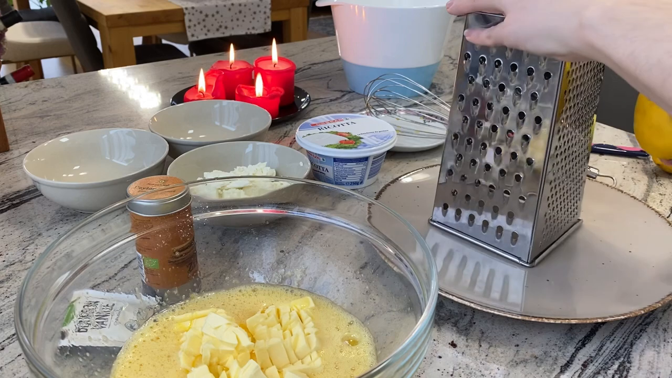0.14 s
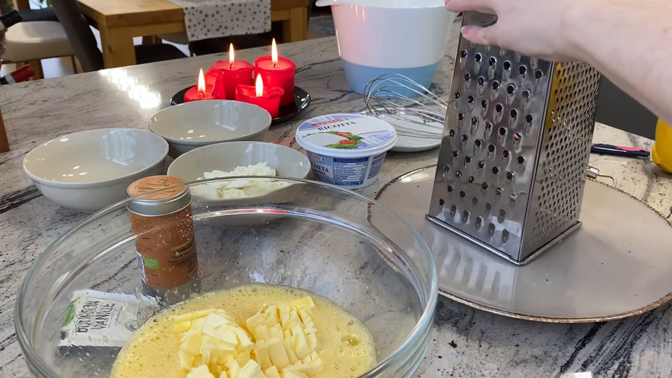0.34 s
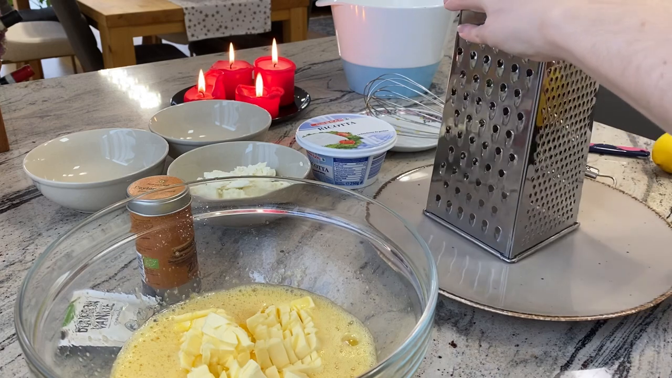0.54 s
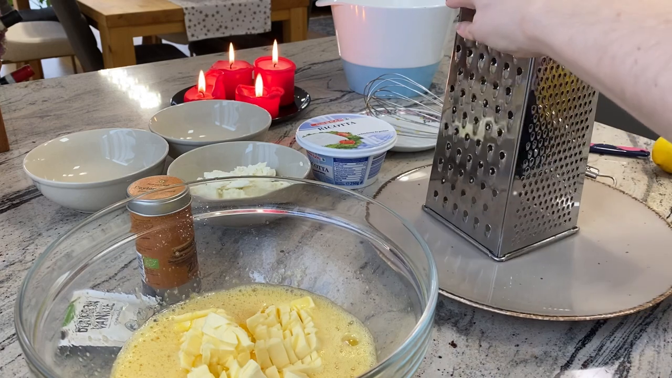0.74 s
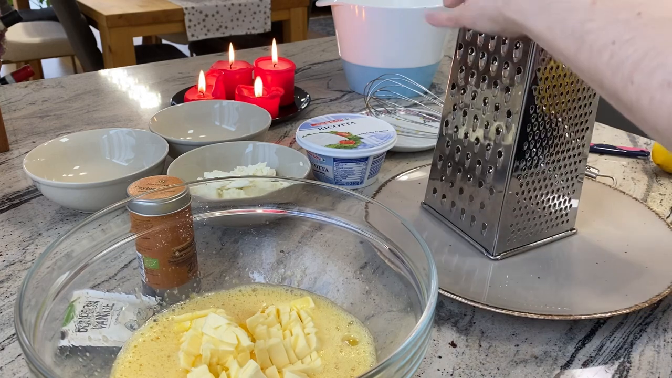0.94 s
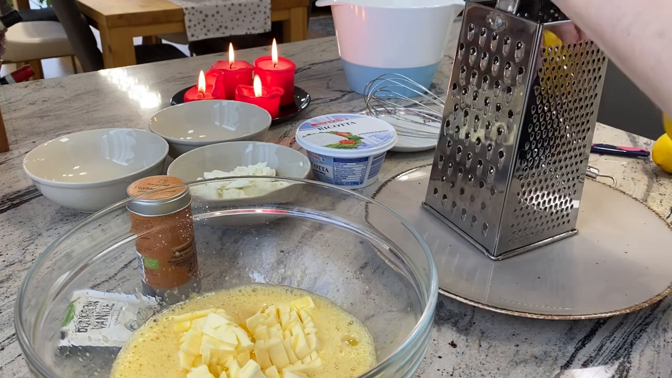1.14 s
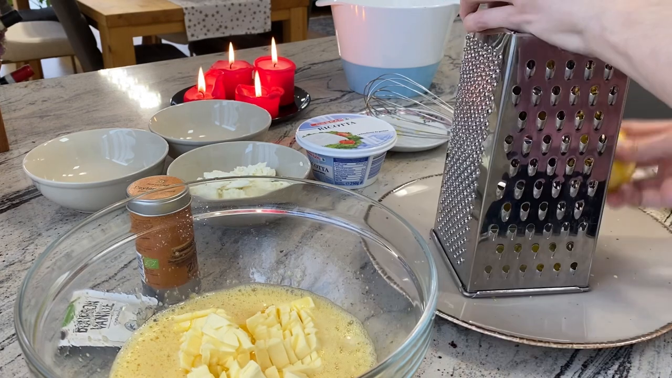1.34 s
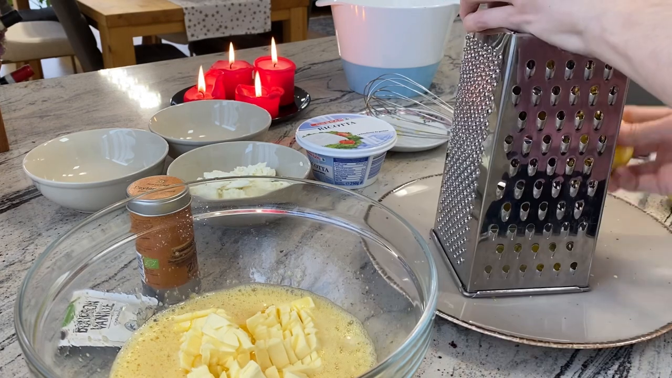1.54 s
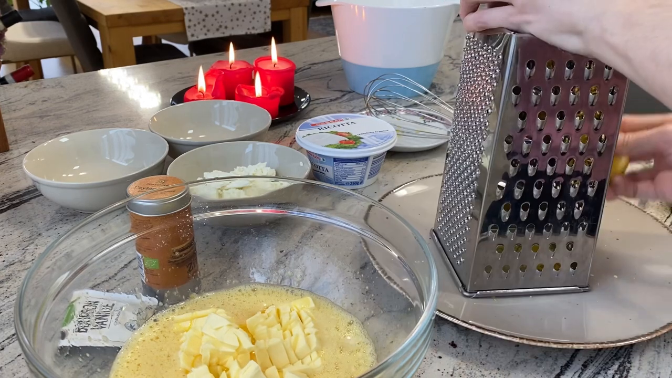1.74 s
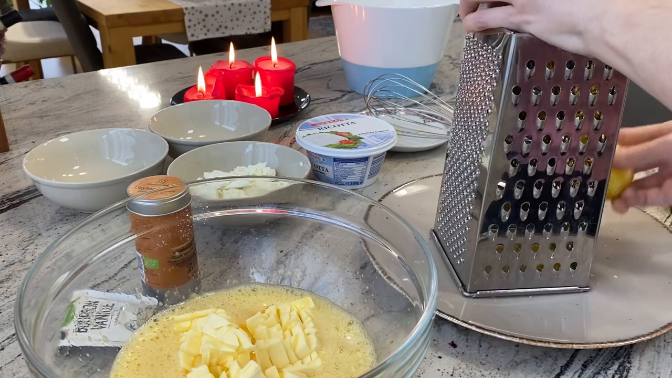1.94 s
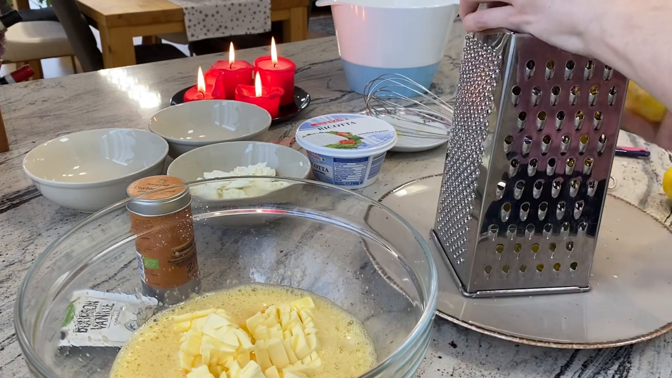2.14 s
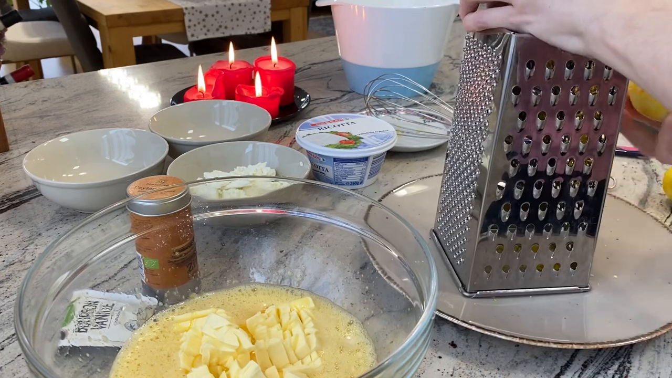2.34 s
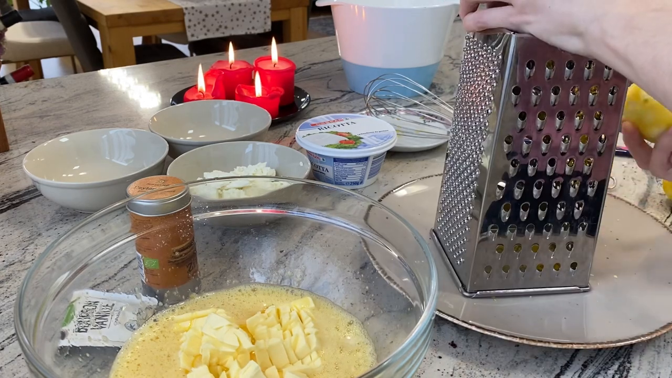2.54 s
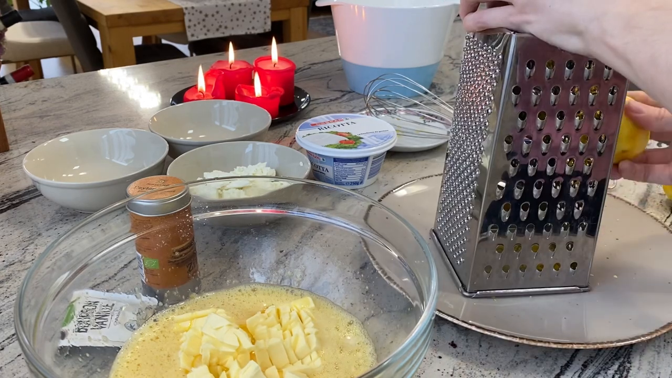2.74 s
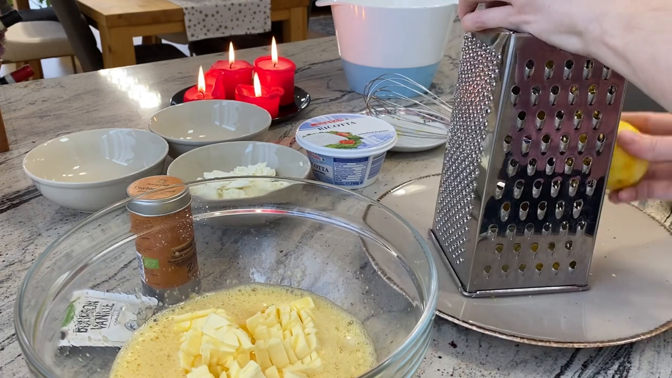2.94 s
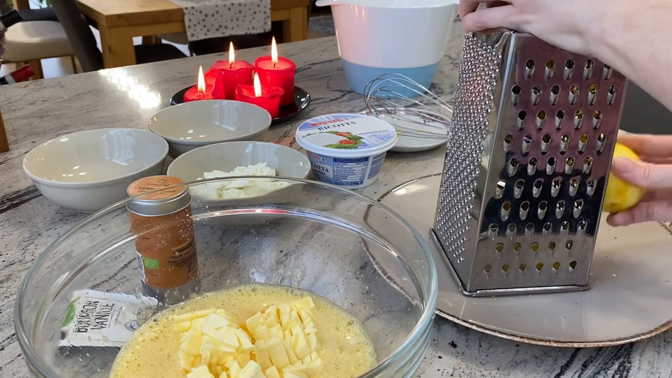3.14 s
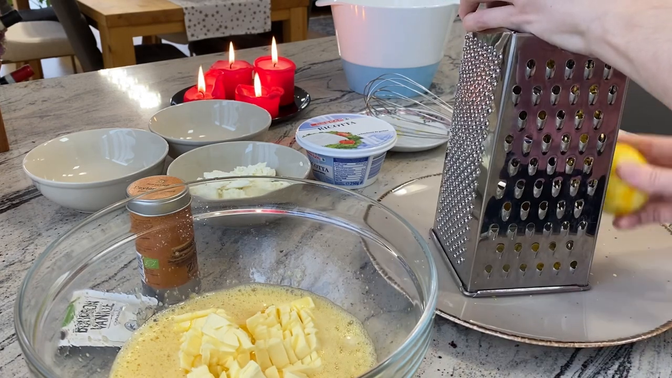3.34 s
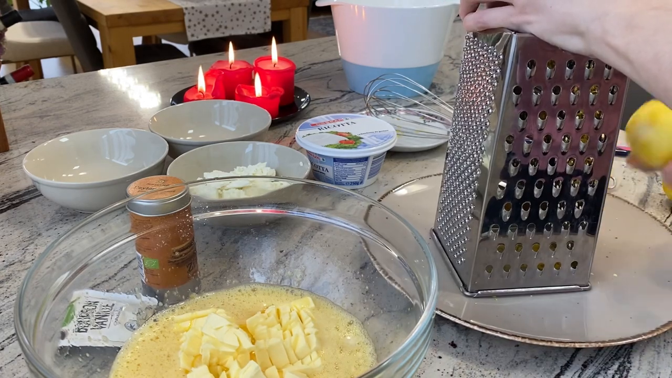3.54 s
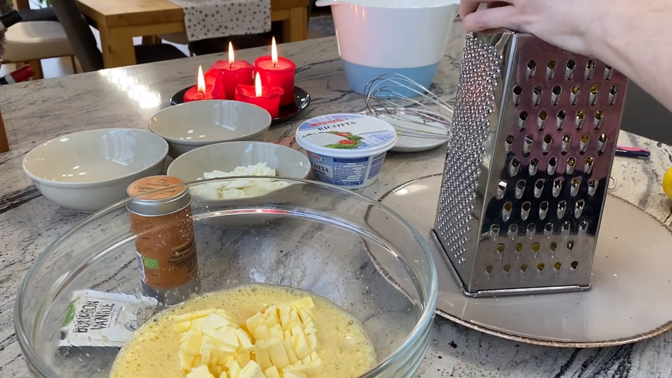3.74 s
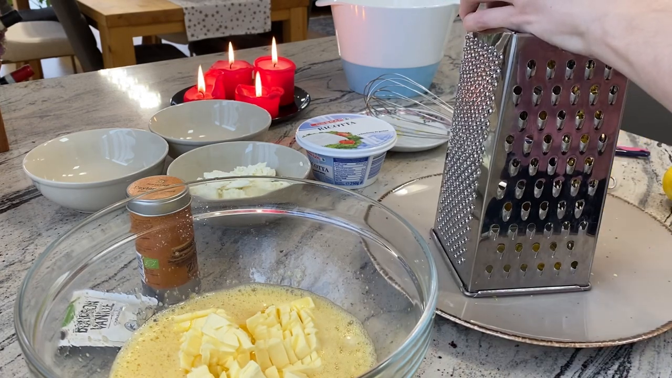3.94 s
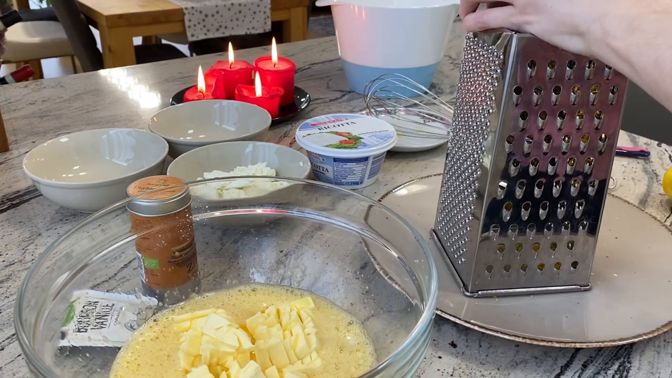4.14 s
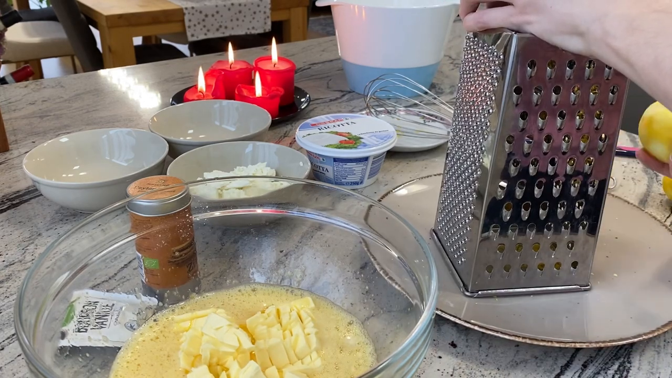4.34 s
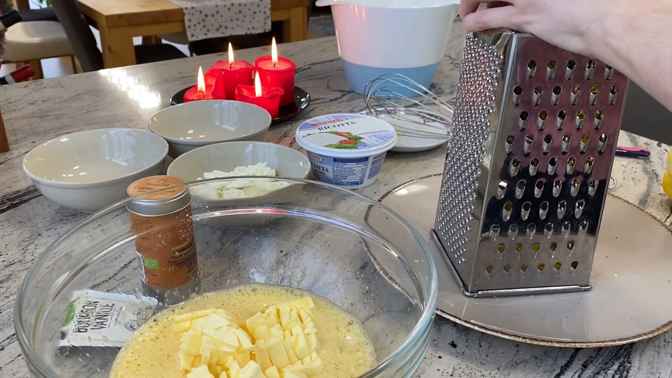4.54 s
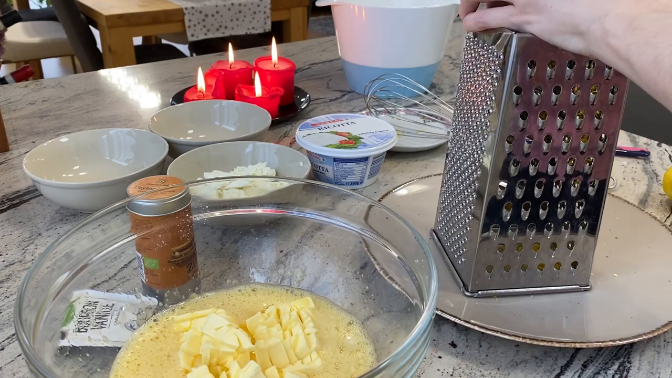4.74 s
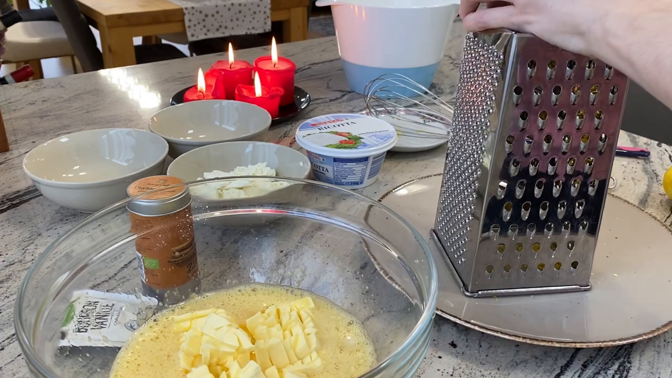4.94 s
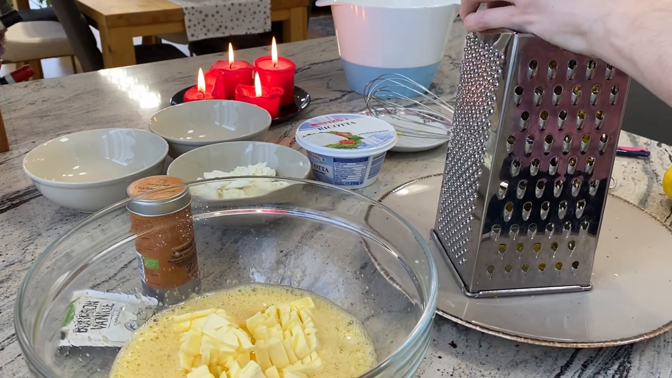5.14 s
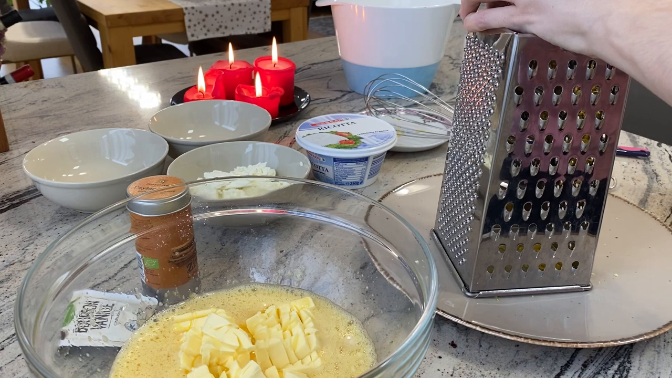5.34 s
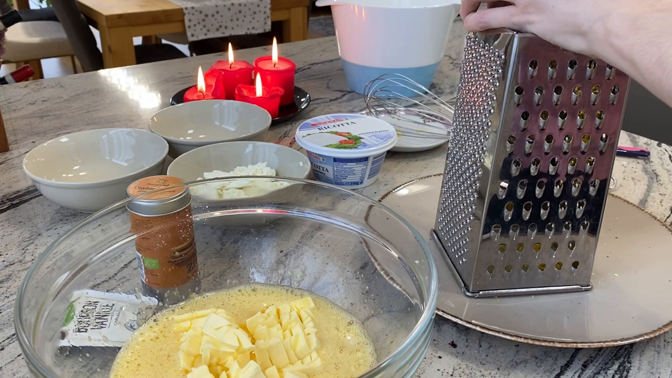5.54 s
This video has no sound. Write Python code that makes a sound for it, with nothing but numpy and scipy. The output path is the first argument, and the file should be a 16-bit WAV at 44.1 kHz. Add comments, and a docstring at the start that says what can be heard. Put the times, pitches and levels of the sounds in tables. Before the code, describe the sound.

A close stereo recording in a home kitchen with a short, lively room answer. A low, slightly wavering appliance hum and soft rumble run throughout, leaning left. From 0 to 1.2 seconds a steel box grater is shifted on a ceramic plate: a dull rattling knock at 0.1, faint sliding, a ringing metallic clank at about 0.95, and another at 1.26. At 1.27 all sound, including the echo, breaks off abruptly and quickly fades back in. From 1.3 to 1.85 lemon rind is rubbed in rapid uneven strokes, gritty dense rasps with ringing steel walls and boxy hollowness, strongest around 1.35, 1.6 and 1.83. A pause holds only faint ticks near 2.7. A second flurry runs from 2.8 to 3.45, starting weakly, with strong rasps at 3.1 and 3.37. Then there is hum, barely audible rustling, and a tiny knock near 5.5.

```python
"""A lemon is rubbed in quick strokes over the teeth of a steel box grater standing on a ceramic plate.
Dense clicks of rind catching on teeth are heard raw and through the ringing steel walls and the hollow.
The grater's foot knocks and slides on the plate: short rattles and noise feed its modes.
A kitchen answers in dying noise; behind it an appliance hums as wavering tones over a low room rumble.
Once, early on, all sound breaks off, echo and all, and fades back in; two microphone ports hear it."""
import sys
import numpy as np
from scipy import signal
from scipy.fft import rfft, irfft, next_fast_len
from scipy.io import wavfile

SR = 44100
rng = np.random.default_rng(int(sys.argv[2]) if len(sys.argv) > 2 else 0)


def materialize(psi):
    """Save the field psi as 16-bit PCM at rate SR to the path in sys.argv[1].

    A 1-D psi becomes a single channel; in a 2-D psi each row is a channel.
    """
    bounded = np.clip(np.atleast_2d(psi).T, -1, 1)
    quanta = np.round(bounded * 32767).astype(np.int16)
    wavfile.write(sys.argv[1], SR, quanta)


N = 246959

# resonances of the steel walls: (frequency [Hz], width [Hz], relative level [dB])
WALL_MODES = [(607, 90, -4), (702.7, 70, -5), (935, 39, -3), (1107, 37, -2), (1338, 56, -2), (1699, 110, 1),
              (1940, 57, -11), (2387, 68, -4), (2587, 120, 3), (3167, 100, -1), (3640, 150, -9),
              (4570, 77, -10.5), (4673, 69, -7.5), (4970, 520, -7), (5900, 67, -18.5), (6600, 220, -14.5),
              (7200, 200, -11.5)]
# colour of tearing rind: (frequency [Hz], gain [dB])
RIND_COLOUR = [(150, -32.5), (250, -17.5), (420, -14), (650, -9), (1000, -8.5), (1700, -6), (2100, -10),
               (2700, -9.5), (4800, -14.5), (8300, -16.5), (10900, -17.5), (13300, -24.5), (16000, -10.5)]
# air and panels of the box: (frequency [Hz], width [Hz], relative level [dB])
HOLLOW_MODES = [(336, 53, 17.5), (414, 41, 18), (445, 28, 9)]
# fast slips that make a wall mode sing: (time [s], half length [s], relative level [dB])
SQUEALS = [(1.58, 0.023, -40.5), (3.14, 0.013, -41), (3.351, 0.012, -41.5)]


def zesting():
    """Rind catches on many teeth: dense clicks, partly heard raw, partly through the steel walls."""
    t = np.arange(N) / SR
    scrape, body, boom = stroke_gains()
    catches = grains(12000, spread_db=1.5) * amp(1.3 * drift(80))   # rows of teeth grip unevenly
    low_pass = signal.butter(2, 1300, fs=SR, output="sos")
    # below 1300 Hz the body gain takes the place of the scrape gain
    drive = catches * scrape + signal.sosfilt(low_pass, catches * (body - scrape))
    struck = drive + bites()

    walls = 0
    for hz, width_hz, db in WALL_MODES:
        wander = amp(3.5 * drift(12))   # the touching spot moves, so each mode comes and goes
        walls = walls + amp(db) * np.sqrt(100 / width_hz) * resonate(struck * wander, hz, width_hz)

    hollow = 0
    for hz, width_hz, db in HOLLOW_MODES:
        wander = amp(2.6 * drift(2.7))
        hollow = hollow + amp(db) * resonate(catches * boom * wander, hz, width_hz)

    slips = sum(amp(db) * np.exp(-((t - s) / half_s) ** 2) for s, half_s, db in SQUEALS)
    squeal = slips * rms_one(resonate(catches, hz=4770, width_hz=90))
    return amp(7.5) * colour(drive, RIND_COLOUR) + amp(3.0) * walls + hollow + squeal


# lemon on the teeth: (time of full force [s], rise [s], hold [s], relative scrape level [dB],
# boom of the hollow relative to the scrape [dB])
STROKES = [(1.301, .03, .01, -46, -5.5), (1.329, .014, 0.051, -31, -9.5), (1.45, .008, 0.016, -41.5, -8),
           (1.487, .008, 0.009, -41.5, -6), (1.569, .012, .055, -30, -17), (1.701, 0.015, 0.003, -36.5, -2),
           (1.74, .03, 0.0064, -45.5, -5.5), (1.818, 0.016, 0.023, -30.5, -10),
           (2.79, 0.0083, .01, -49.5, -3), (2.817, 0.029, .004, -40.5, 2), (2.855, 0.029, .002, -36.5, -7),
           (2.947, .02, .1, -63.5, -4), (3.079, 0.014, .056, -30.5, -6), (3.219, 0.022, 0.032, -50.5, 4),
           (3.314, 0.024, 0.019, -34, -6), (3.361, 0.036, 0.019, -29.5, -9), (3.44, 0.024, .03, -56.5, -5)]
STROKE_FALL_DB_PER_S = 340.5
BODY_DB, BODY_FOLLOWS = 1.0, .55   # gain over a -30 dB scrape, nearly; share of its swing that is followed


def stroke_gains():
    """Gains of scrape, low body and boom; the body swings less than the scrape, silent off the teeth."""
    scrape, boom = 0, 0
    for full_s, rise_s, hold_s, scrape_db, boom_db in STROKES:
        level_db = scrape_db + shape(full_s, rise_s, hold_s, STROKE_FALL_DB_PER_S)
        scrape = scrape + amp(level_db)
        boom = boom + amp(level_db + boom_db)
    relative = scrape / amp(-30)
    body = amp(BODY_DB) * scrape * (relative + 0.079) ** (BODY_FOLLOWS - 1)
    return scrape, body, boom


# a tooth digs in and taps the wall: (time [s], relative click level [dB])
BITES = [(1.3244, -8.5), (1.4481, -16), (1.4835, -16), (1.567, -11.5), (1.7002, -17), (1.8136, -10.5),
         (2.784, -30), (2.8535, -19.5), (3.0766, -11.5), (3.3158, -12)]


def bites():
    """A tooth that digs in gives the wall one click, a single sample long."""
    s, db = np.transpose(BITES)
    clicks = np.zeros(N)
    clicks[(s * SR).astype(int)] = amp(db)
    return clicks


# grater foot on the plate: (time [s], relative level [dB], rise [s], rattle decay [s],
# brightness [dB per octave], nearness to the rim [dB])
KNOCKS = [(0.094, -17.5, 0.0098, 0.011, 1.5, 16), (0.139, -32.5, 0.0025, 0.0092, -4, 17.5),
          (0.164, -34.5, 0.00363, 0.0093, -4.5, 12), (.946, -22.5, 0.0017, 0.034, 6, 7),
          (.952, -15, 0.0039, 0.027, -0.5, -18.5), (1.042, -32, 0.0031, 0.013, -4.5, -2),
          (1.186, -58.5, 0.0026, 0.01, 19.5, -6), (1.258, -23.5, 0.0021, 0.022, 4, 10),
          (1.264, -21.5, 0.00195, 0.008, 1.5, 0), (2.666, -42.5, 0.00093, 0.015, 0.5, -3.5),
          (2.735, -46.5, .001, .01, 6, -1.5), (2.97, -37, 0.0014, .01, 0, 4),
          (4.719, -63.5, 0.0012, 0.011, 14.5, -2), (5.479, -41, .001, 0.014, -1, -6)]
# contact noise of a knock before its brightness: (frequency [Hz], gain [dB])
CLACK_COLOUR = [(120, -55.5), (200, -15.5), (696, -5.5), (1480, -7.5), (1680, -2), (2090, -22.5),
                (2470, -17.5), (7830, -50.5), (15100, -72), (16000, -91.5)]


def knocks(rows):
    """The foot lands with one firm blow inside a short rattle; both strike the modes."""
    t, out = np.arange(N) / SR, np.zeros(N)
    modes_hz, _, _, favour = np.transpose(STANDING_MODES)
    rattle = grains(8000, spread_db=2.0)
    uneven_db = rng.normal(0, 1, (len(rows), len(favour)))
    for (s, db, rise_s, rattle_s, tilt_db, rim_db), chance_db in zip(rows, uneven_db):
        i = round(s * SR)
        since = t[:N - i][:SR]
        climb = since / max(rise_s, .0003)
        decay = np.exp((rise_s - since) / max(rattle_s, .001))
        force = np.minimum(climb, decay)
        drive = amp(db) * rattle[i:i + SR] * force + 1e-18
        clack_points = [(hz, gain_db + tilt_db * np.log2(hz / 1700)) for hz, gain_db in CLACK_COLOUR]
        clack = colour(drive, clack_points)[:len(since)]
        blow = amp(-1.0) * drive
        # the single blow is scaled by the energy of the rattle's force
        blow[round(rise_s * SR * .8)] += amp(db) * np.sqrt(np.sum(force ** 2))
        shares_db = chance_db + favour * rim_db + tilt_db * np.log2(modes_hz / 1700)
        out[i:i + SR] += amp(5.0) * clack + amp(6.0) * ring(blow, shares_db)
    return out


# grater standing on the plate: (frequency [Hz], relative level [dB], t60 [s],
# how much a blow near the rim favours the mode [-1..1])
STANDING_MODES = [ (460, -17, 0.16, 0.83), (545, -16, 0.36, -0.37), (612, -19.5, .4, 0.18),
                  (766, -21.5, .3, -0.22), (922, -15.5, 0.17, -.2), (966, -20, 0.3, -0.65),
                  (1082, -10, 0.11, 0.7), (1140, -18, .35, 0.2), (1237, -16.5, .35, -0.22),
                  (1440, -27.5, .4, 0.22), (1660, -1, 0.16, -0.29), (1674, -2.5, 0.4, -0.023),
                  (1738, -3.5, 0.49, 0.15), (1920, -26.5, .4, 0.21), (2380, -12.5, 0.21, 0.028),
                  (2440, -19, 0.26, 0.042), (2560, -21, 0.3, .1), (2687, -23, 0.06, .3),
                  (3085, -31.5, 0.37, .2), (3420, -20.5, .25, -0.11), (3570, -30.5, 0.2, 0.51),
                  (3690, -35.5, .4, .1), (4453, -22.5, 0.12, 0.0), (4780, -34, .3, 0.31),
                  (5840, -38, .15, 0.2), (7140, -34.5, 0.071, 0.48)]


def ring(drive, shares_db):
    """The standing grater's modes ring as decaying resonances, each fed with its own share."""
    out = 0
    for (hz, db, t60_s, _), share_db in zip(STANDING_MODES, shares_db):
        width_hz = np.log(1000) / np.pi / t60_s
        out = out + amp(db + share_db) * np.sqrt(t60_s * 20) * resonate(drive, hz, width_hz)
    return out


def handling():
    """Soft sliding: a thin hiss, a duller rustle and the steel humming faintly as its foot drags."""
    hiss_gain, rustle_gain, drag_gain = slide_gains()
    modes_hz = np.transpose(STANDING_MODES)[0]
    hiss = colour(rng.standard_normal(N), [(1500, -22.5), (3500, 6.5), (8000, -10.5), (15000, -10)])
    rustle_points = [(250, -24.5), (600, -1.5), (950, 0), (1800, -13.5), (3500, -25.5), (9000, -56.5)]
    rustle = colour(grains(3000, spread_db=-1.5), rustle_points)
    drag = ring(rng.standard_normal(N), 4 * np.log2(modes_hz / 1700))   # a hard edge favours high modes
    return hiss_gain * rms_one(hiss) + rustle_gain * rms_one(rustle) + drag_gain * rms_one(drag)


# hands and grater sliding softly: (time [s], length [s], then relative levels
# of hiss [dB], rustle [dB] and dragged steel [dB])
SLIDES = [(0, 0.19, -77.5, -70, -68), (0.336, 0.14, -74.5, -67.5, -73.5), (.66, 0.12, -79, -71.5, -71),
          (.94, 0.36, -73.5, -63, -79), (1.263, 0.02, -70, -55.5, -70), (3.603, 0.29, -89.5, -75.5, -110),
          (4.502, 0.054, -92, -67.5, -110), (4.62, 0.035, -97, -80, -110), (4.74, 0.028, -89, -84, -110),
          (5.3, 0.14, -101, -70, -110)]
SLIDE_RISE_S, SLIDE_FALL_DB_PER_S = .015, 91.5
REST_HISS_DB, REST_RUSTLE_DB = -103, -77.5   # a constant floor under the slides


def slide_gains():
    """Gains of hiss, rustle and drag: each slide swells quickly and dies away over a constant floor."""
    moving = 0
    for s, length_s, *levels_db in SLIDES:
        envelope = amp(shape(s, SLIDE_RISE_S, length_s, SLIDE_FALL_DB_PER_S))
        moving = moving + envelope * amp(levels_db)[:, None]
    return moving[0] + amp(REST_HISS_DB), moving[1] + amp(REST_RUSTLE_DB), moving[2]


# steady hum tones: (frequency [Hz], relative level [dB], rate of wavering [Hz])
HUM_LINES = [(99.95, -44.5, .8), (195.4, -64, 2)]
# appliance motor: (time [s], frequency [Hz], relative level [dB])
MOTOR = [(0, 67.6, -47), (1.26, 65.85, -47), (1.29, 64.2, -52.5), (3.2, 64.1, -53), (3.4, 65.4, -45),
         (3.6, 64, -50.5), (5.6, 64, -59)]
# colour of the room rumble: (frequency [Hz], gain [dB])
RUMBLE_COLOUR = [(12, -67.5), (20, -49), (48, -9.5), (104, -10.5), (130, -14.5), (193, -18.5), (328, -28.5),
                 (388, -25.5), (485, -33.5), (574, -33.5), (976, -43), (1150, -45), (16000, -83.5)]
# spread of rumble and handling: (frequency [Hz], side gain [dB])
WIDE_AIR = [(25, -22), (60, -13.5), (110, 2.5), (200, -14.5), (380, -1), (700, 3.5), (1300, 0.5),
            (2400, -0.5), (15000, -2.5)]


def hum():
    """Mains lines and a motor tone that waver, louder on the left, over room rumble of coloured noise."""
    t = np.arange(N) / SR
    lines = 0
    for hz, db, rate_hz in HUM_LINES:
        level = amp(db + 0.5 + 0.5 * drift(rate_hz))
        lines = lines + level * np.sin(2 * np.pi * hz * t + 0.65 * drift(rate_hz))
    motor_hz, motor_db = in_time(MOTOR)
    motor_phase = 2 * np.pi * np.cumsum(motor_hz) / SR + 1.1 * drift(1.6)
    motor = amp(motor_db + 2.5 + 2.1 * drift(1.1)) * np.sin(motor_phase)
    rumble = amp(-51) * rms_one(colour(rng.standard_normal(N), RUMBLE_COLOUR))
    tones = lines * amp([[2.5], [-2.5]]) + motor * amp([[.4], [-.4]])
    return tones + widen(rumble, WIDE_AIR, left_db=3.0, smear_s=0.06)


# how long the kitchen answers: (frequency [Hz], t60 [s])
KITCHEN_T60 = [(200, .6), (800, 0.91), (3000, 0.64), (6000, 0.58), (9000, 0.15), (13000, 0.62)]


def kitchen(x):
    """Diffuse tail: noise dying band by band, its own in each channel."""
    t, tail = np.arange(SR) / SR, 0
    edges = 90 * 2 ** np.arange(0, 8, .5)   # half-octave bands
    white = rng.standard_normal((2, 2, SR))
    for k, (low, high) in enumerate(zip(edges, edges[1:])):
        band = signal.butter(2, [low, high], "band", fs=SR, output="sos")
        decay = amp(-60 * t / at_hz(KITCHEN_T60, np.sqrt(low * high)))
        tail = tail + signal.sosfilt(band, white[k % 2]) * decay
    tail = tail * np.minimum(t / 0.0062, 1)   # the answer builds up over 6.2 ms
    return signal.fftconvolve(x[None], tail / np.sqrt(np.sum(tail ** 2) / 2), axes=1)[:, :N]


def widen(x, side_points, left_db, smear_s):
    """Side sound reaches the two microphone ports by scattered early paths."""
    paths = rng.standard_normal(2000) * np.exp(-np.arange(2000) / SR / smear_s)
    scattered = signal.fftconvolve(x, paths / np.linalg.norm(paths))[:N]
    side = colour(scattered, side_points)
    return np.array([x + side, x - side]) * amp([[left_db / 2], [-left_db / 2]])


# two ports hearing the grater: (frequency [Hz], phase by which left leads [rad])
LEFT_LEAD = [(0, 0), (600, -1), (1500, -.3), (3000, .3), (5300, .2), (6900, 0), (8000, -2.5), (9700, -5.5),
             (12700, -9.3), (16000, -12.7)]
# their unlike shading: (frequency [Hz], left relative to right [dB])
LEFT_LEVEL = [(60, 4.5), (110, 3.5), (200, -0.5), (380, -3), (700, 7.5), (1290, 2.5), (2380, 2), (4400, 4),
              (8120, 1.5), (15000, 0.5)]


def ports(pair):
    """The ports sit apart and are shaded unlike: half the lead and tilt to each."""
    size = next_fast_len(N + 4096)
    hz = np.linspace(0, SR / 2, size // 2 + 1)
    half_lead = np.exp(.5j * np.interp(hz, *np.transpose(LEFT_LEAD)))
    half = amp(at_hz(LEFT_LEVEL, hz + 1) / 2) * half_lead
    return irfft(rfft(pair, size) * [half, 1 / half], size)[:, :N]


def amp(db):
    """Amplitude factor of a level in dB."""
    return 10 ** (np.asarray(db) / 20)


def rms_one(x):
    """Scale to rms 1."""
    return x / np.sqrt(np.mean(x ** 2) + 1e-20)


def in_time(rows):
    """Columns of a (time [s], ...) table, straight lines between rows."""
    s, *columns = np.transpose(rows)
    return [np.interp(np.arange(N) / SR, s, c) for c in columns]


def at_hz(points, hz):
    """Value at a frequency, straight lines over log frequency."""
    point_hz, values = np.transpose(points)
    return np.interp(np.log(hz), np.log(point_hz), values)


def colour(x, points):
    """Causal minimum-phase filter whose gain follows (frequency [Hz], gain [dB]) points."""
    hz = np.linspace(0, SR / 2, 2049)
    log_gain = np.log(amp(at_hz(points, np.maximum(hz, 1))))
    cepstrum = irfft(log_gain)
    cepstrum[1:2048] *= 2   # folding the cepstrum makes the filter causal
    cepstrum[2049:] = 0
    return signal.fftconvolve(x, irfft(np.exp(rfft(cepstrum))))[:N]


def drift(rate_hz):
    """Slow chance, rms 1: noise through two equal one-pole low-passes."""
    r = np.exp(-2 * np.pi * rate_hz / SR)
    slow = signal.lfilter([1], [1, -2 * r, r * r], rng.standard_normal(N + SR))
    return rms_one(slow[SR:])   # the first second settles


def resonate(x, hz, width_hz):
    """Two-pole resonance, gain about 1 on top."""
    r = np.exp(-np.pi * width_hz / SR)
    feedback = [1, -2 * r * np.cos(2 * np.pi * hz / SR), r * r]
    return signal.lfilter([(1 - r * r) / 2, 0, (r * r - 1) / 2], feedback, x)


def grains(per_s, spread_db):
    """Random clicks of uneven size and either sign; rms 1."""
    sizes = amp(spread_db * np.minimum(rng.exponential(1, N), 3.0)) * rng.choice([-1, 1], N)
    return rms_one(sizes * (rng.random(N) < per_s / SR))


def shape(full_s, rise_s, hold_s, fall_db_per_s):
    """Envelope in dB: straight climb to full, hold, straight fall."""
    t = np.arange(N) / SR
    climb = 26.5 * (t - full_s) / rise_s   # 26.5 dB within the rise
    fall = fall_db_per_s * (full_s + hold_s - t)
    return np.minimum(0, np.minimum(climb, fall))


# spread of the grater's close sound: (frequency [Hz], side gain [dB])
WIDE_NEAR = [(60, -14), (250, -12), (420, -9), (650, 5.5), (900, -0.5), (1500, -6.5), (2500, -14.5),
             (5000, -12.5), (9000, -8.5), (15000, -12)]
BREAK_S, FADE_OUT_S, FADE_IN_S = 1.2732, 0.0022, 0.017


def scene():
    """Sounds before the break stop with it, echo and all; the rest fades in after it."""
    t = np.arange(N) / SR
    before = np.clip((BREAK_S - t) / FADE_OUT_S, 0, 1)
    after = np.clip((t - BREAK_S) / FADE_IN_S, 0, 1)
    late = zesting() + knocks([row for row in KNOCKS if row[0] > BREAK_S])
    early = knocks([row for row in KNOCKS if row[0] < BREAK_S])
    steady = widen(handling(), WIDE_AIR, left_db=1.0, smear_s=0.032) + hum()

    def in_kitchen(x):
        """Close sound at the two ports plus the kitchen's answer."""
        close = ports(widen(x, WIDE_NEAR, left_db=-0.5, smear_s=0.0038))
        return close + amp(-8.0) * kitchen(x)

    return before * (steady + in_kitchen(early)) + after * (steady + in_kitchen(late))


def record(dry):
    """The microphone's top is cut: a steep low-pass, 70 dB down from 16.4 kHz."""
    return signal.sosfilt(signal.cheby2(12, 70, 16400, fs=SR, output="sos"), dry)


dry = scene()
out = record(dry)
materialize(out)
```